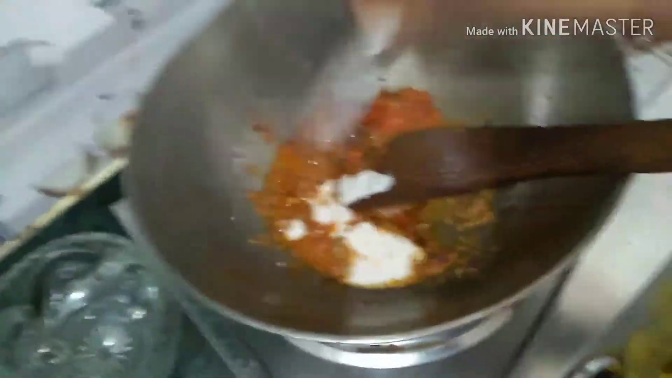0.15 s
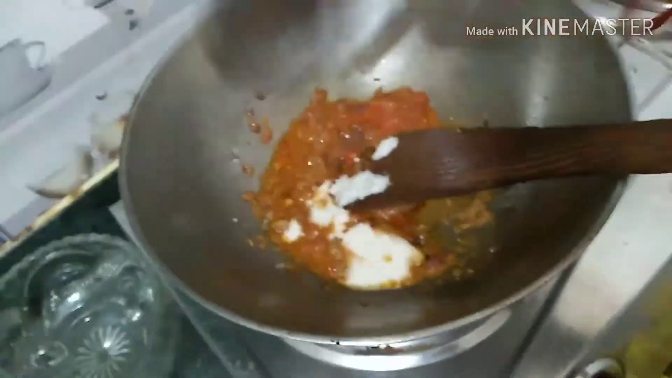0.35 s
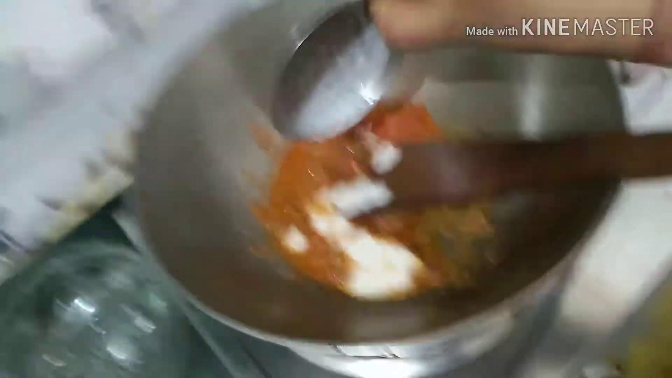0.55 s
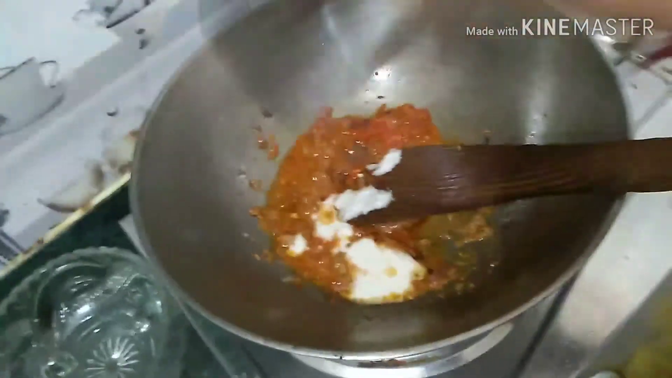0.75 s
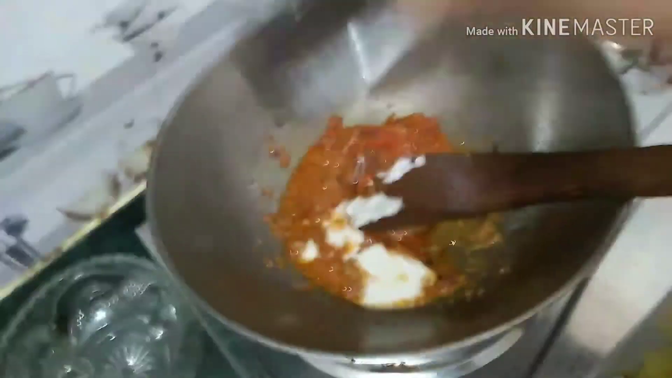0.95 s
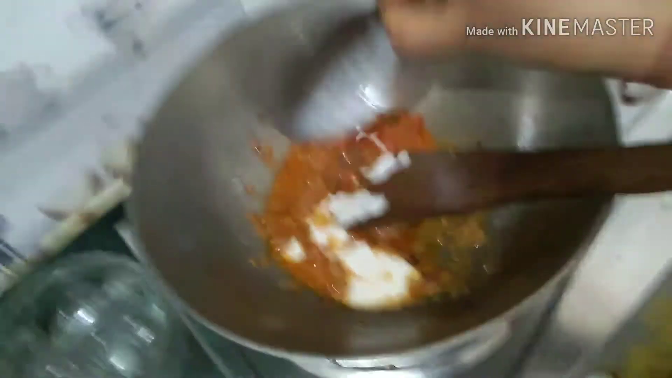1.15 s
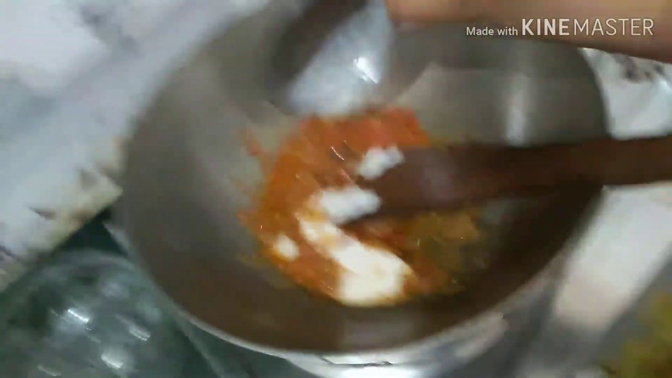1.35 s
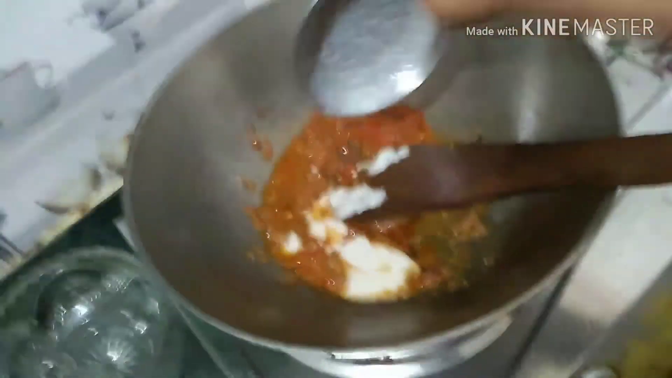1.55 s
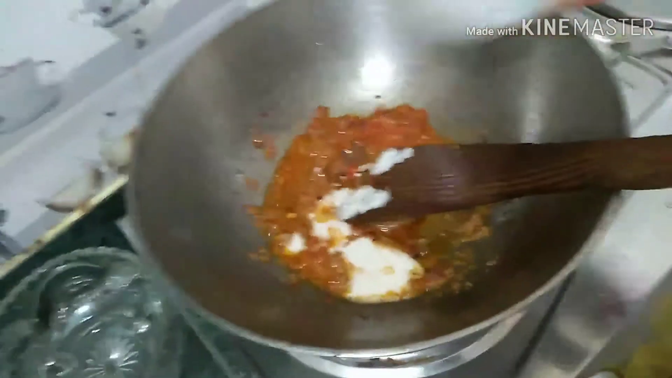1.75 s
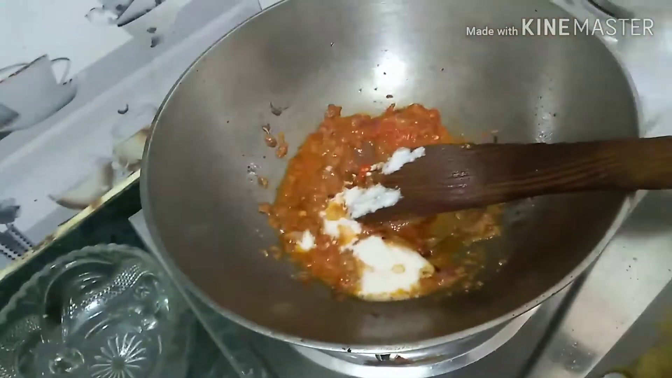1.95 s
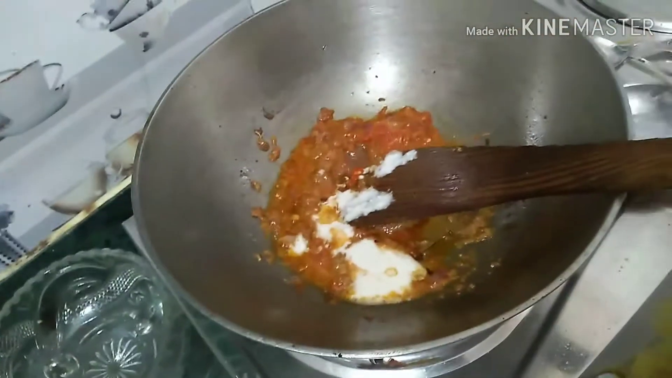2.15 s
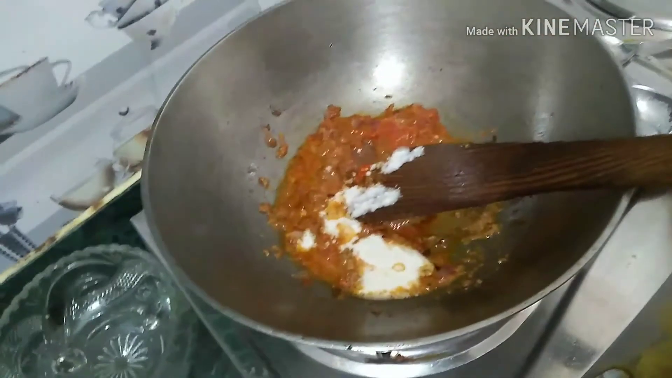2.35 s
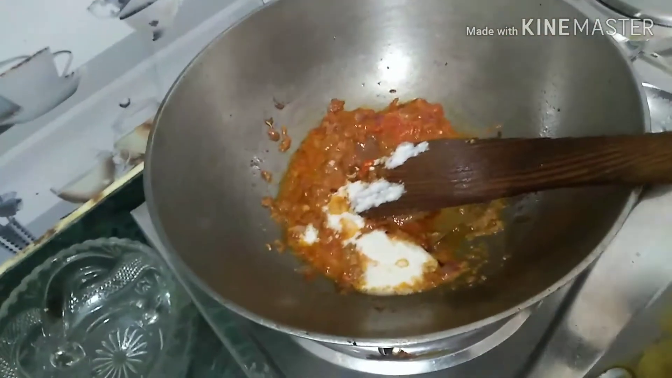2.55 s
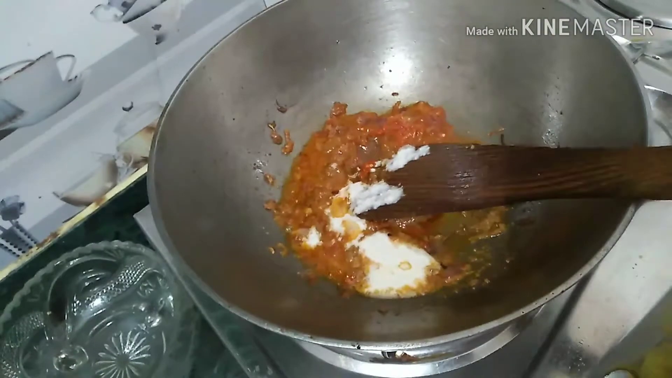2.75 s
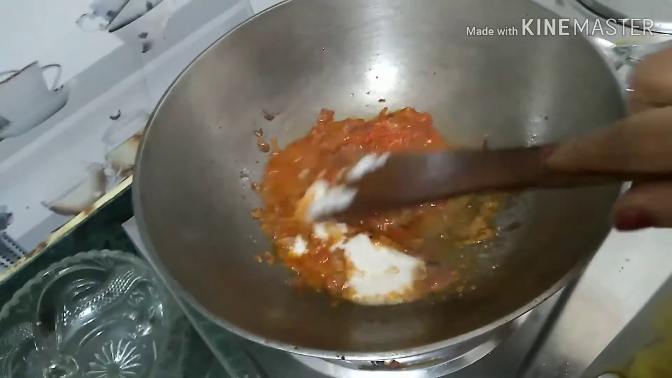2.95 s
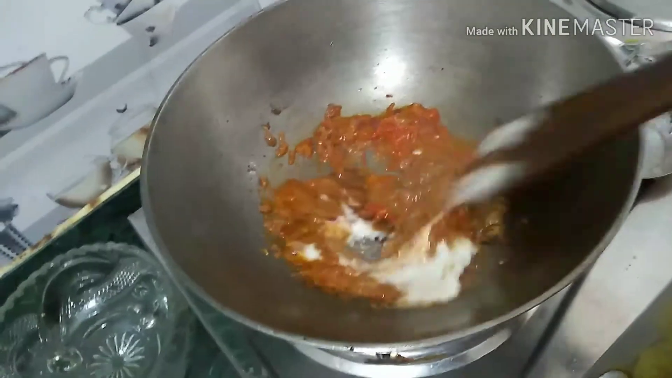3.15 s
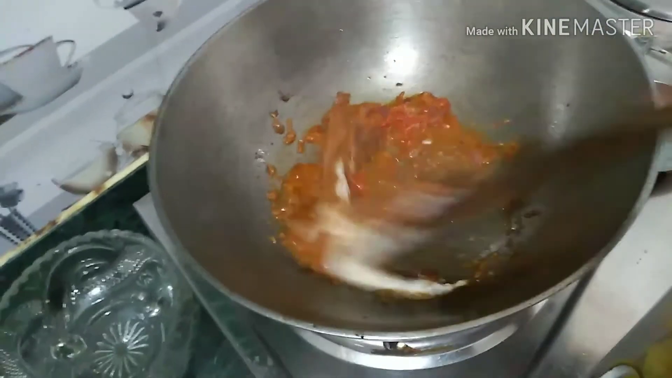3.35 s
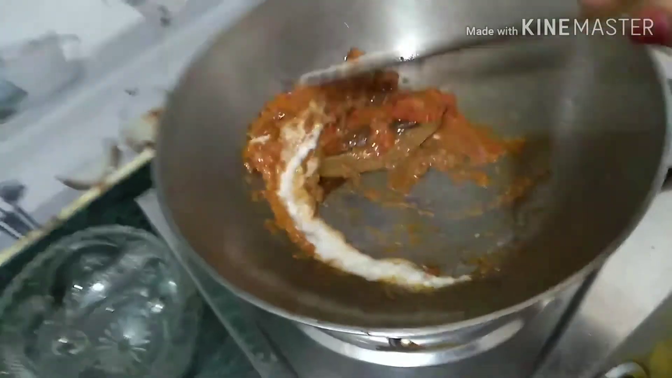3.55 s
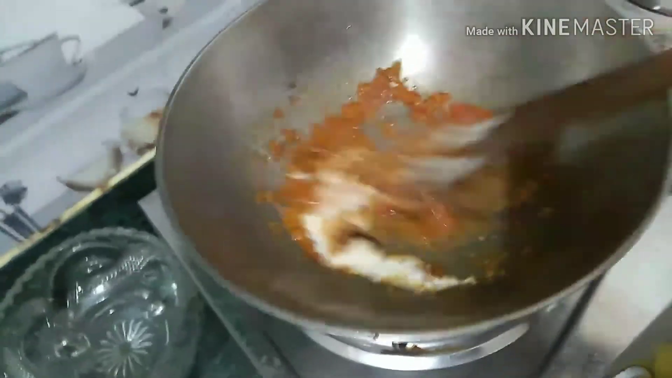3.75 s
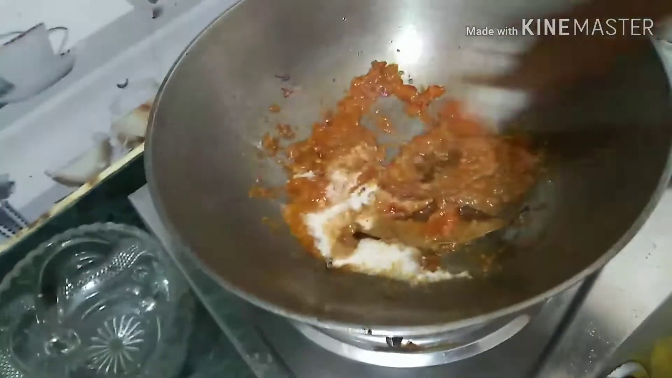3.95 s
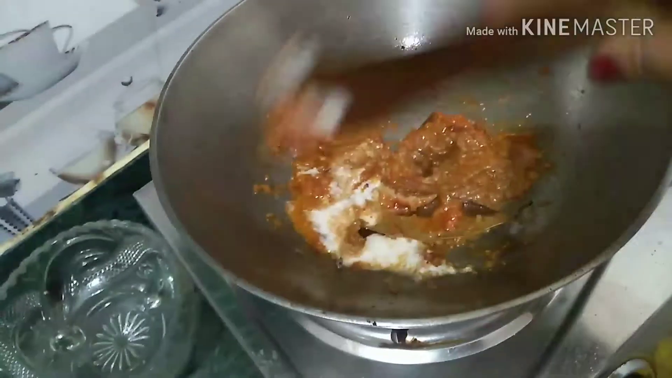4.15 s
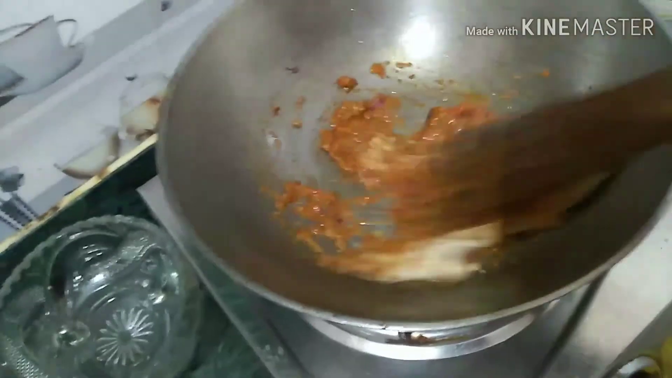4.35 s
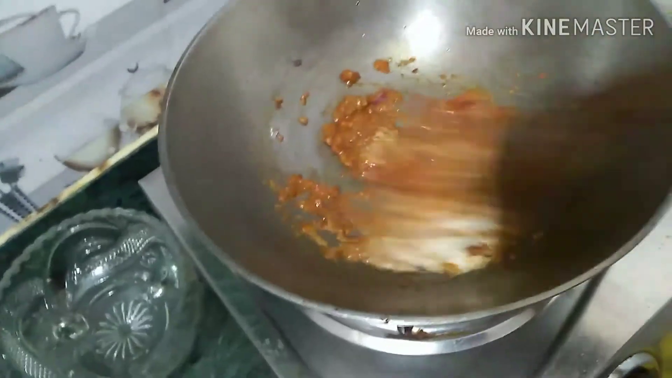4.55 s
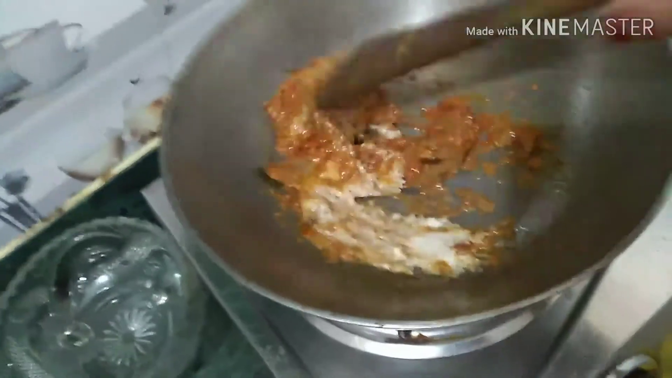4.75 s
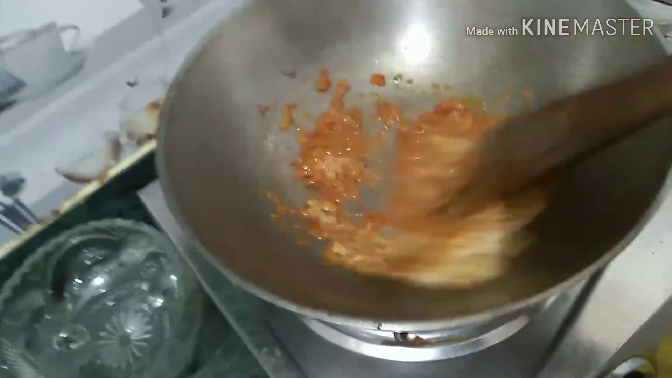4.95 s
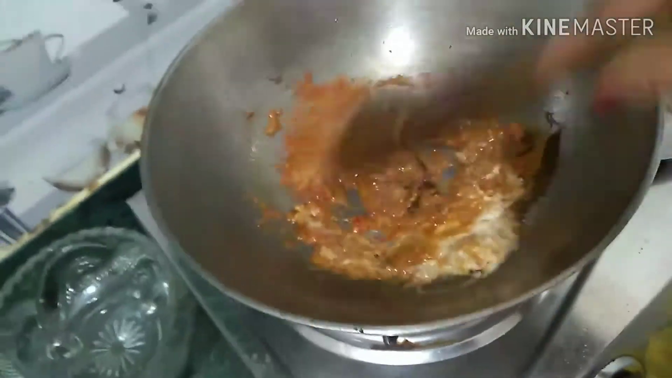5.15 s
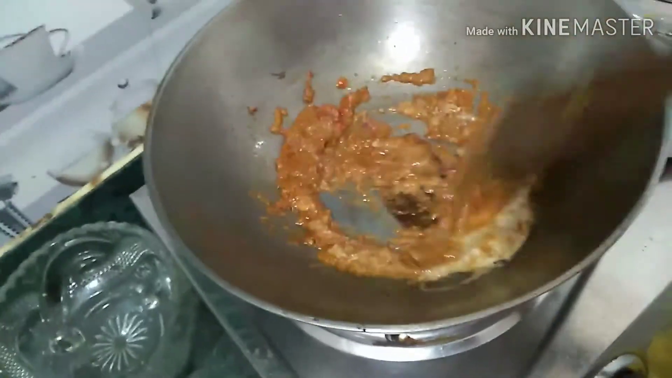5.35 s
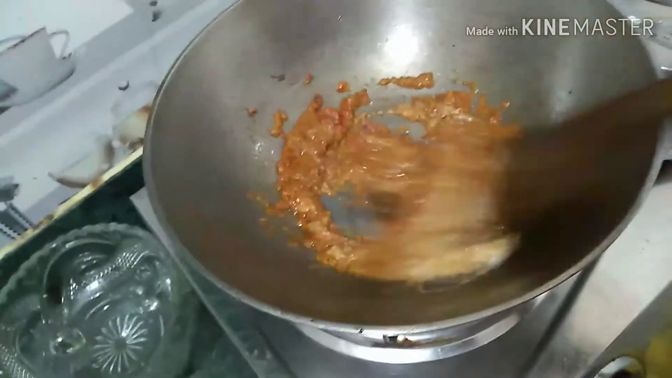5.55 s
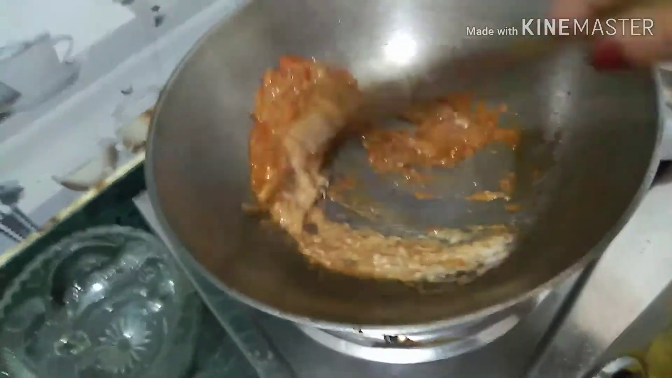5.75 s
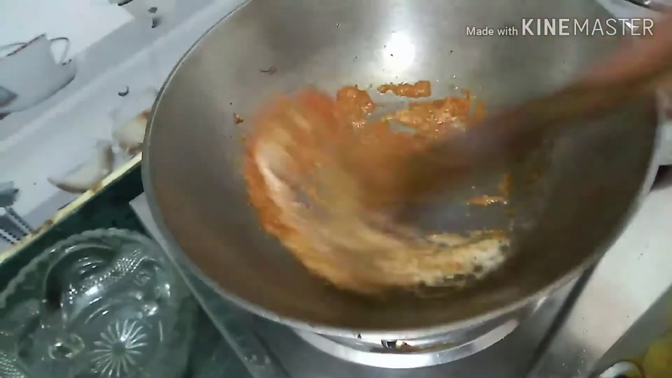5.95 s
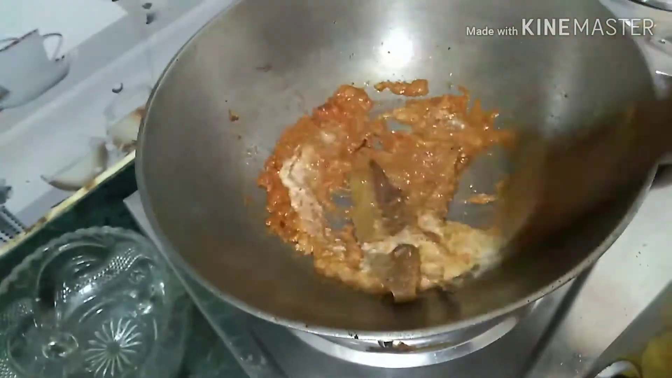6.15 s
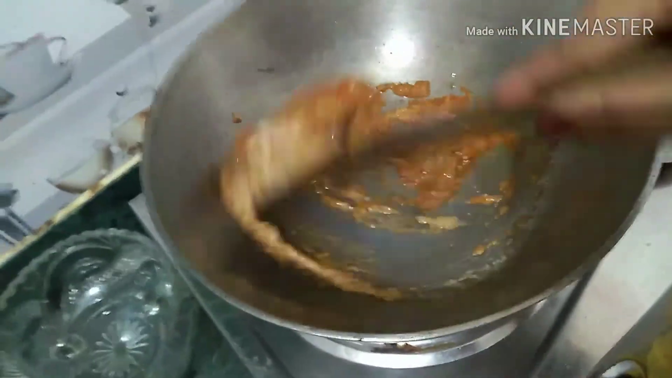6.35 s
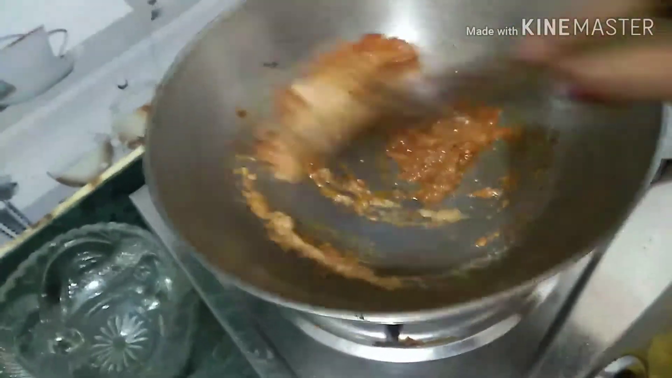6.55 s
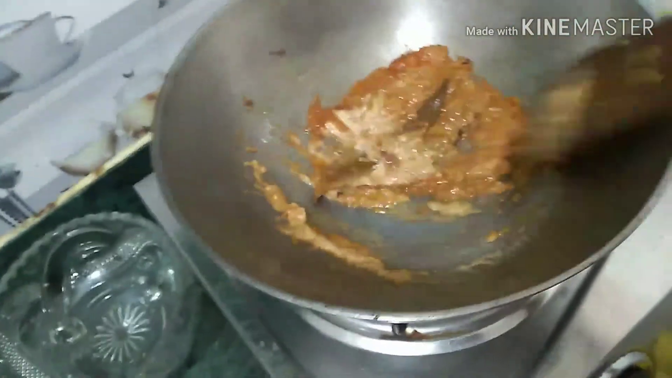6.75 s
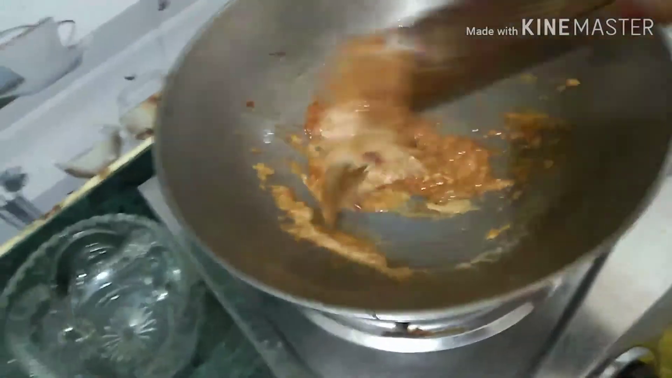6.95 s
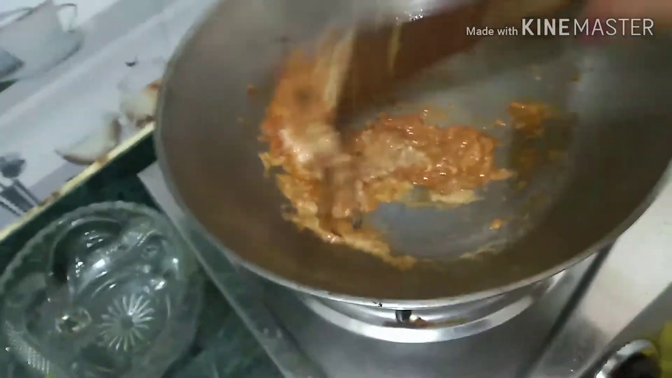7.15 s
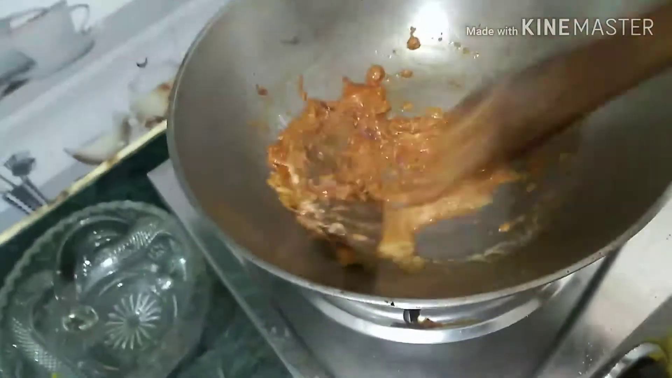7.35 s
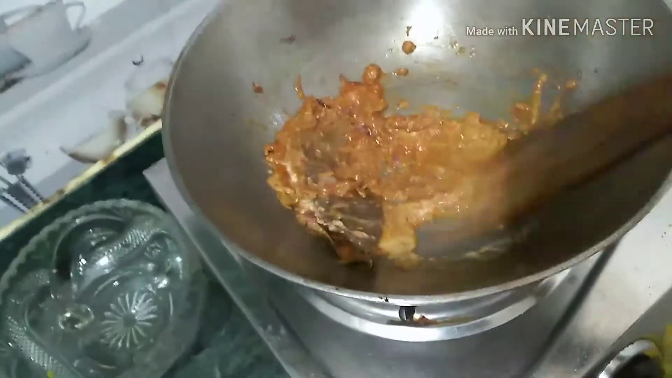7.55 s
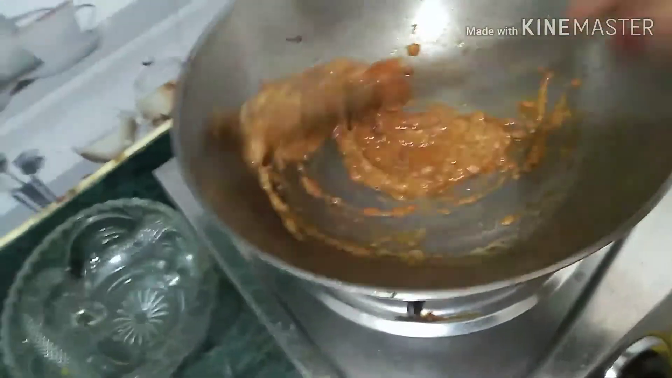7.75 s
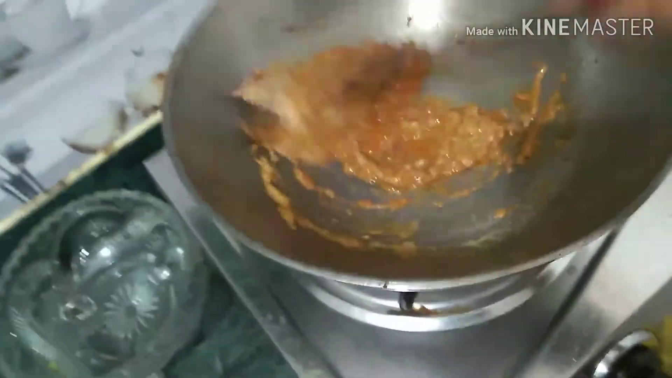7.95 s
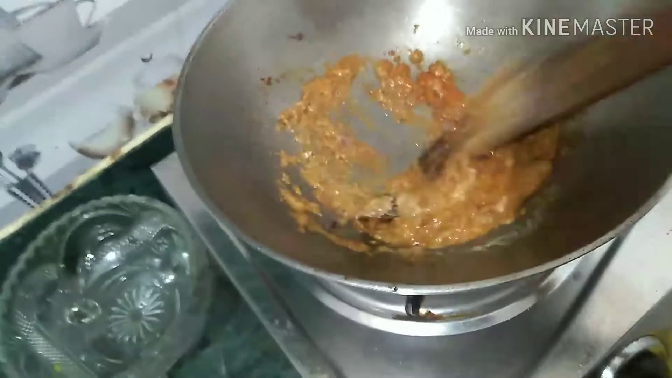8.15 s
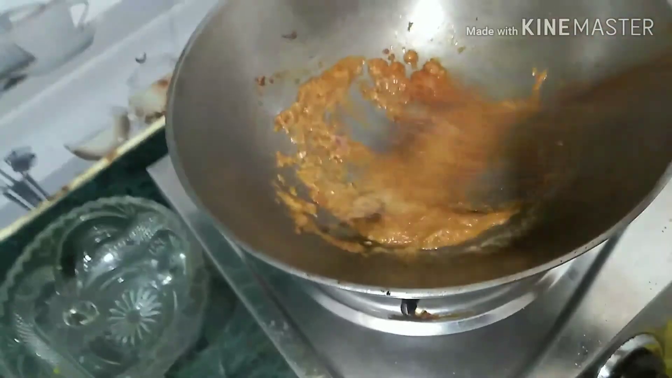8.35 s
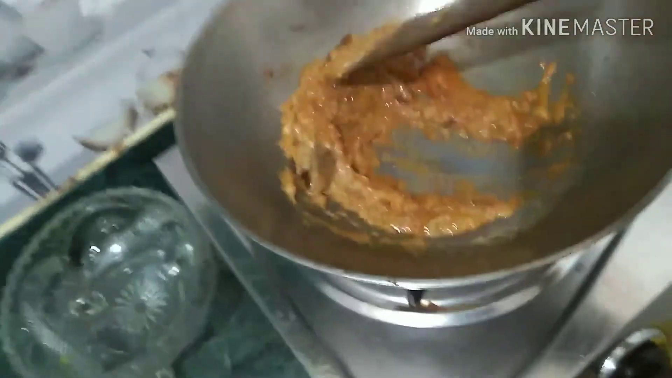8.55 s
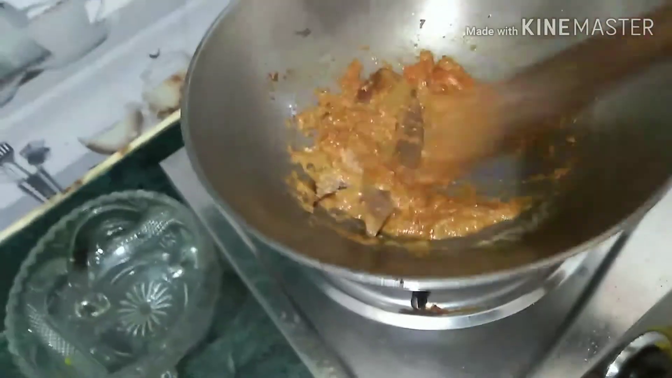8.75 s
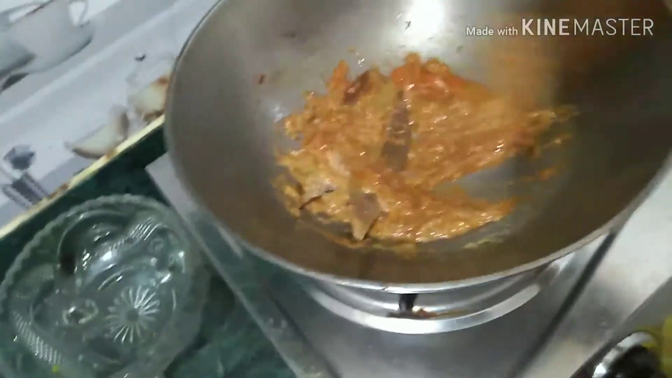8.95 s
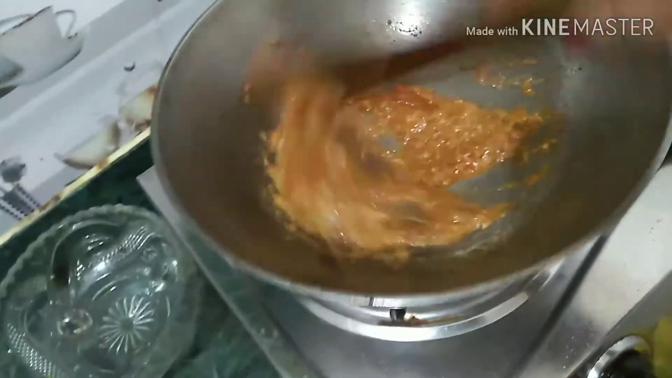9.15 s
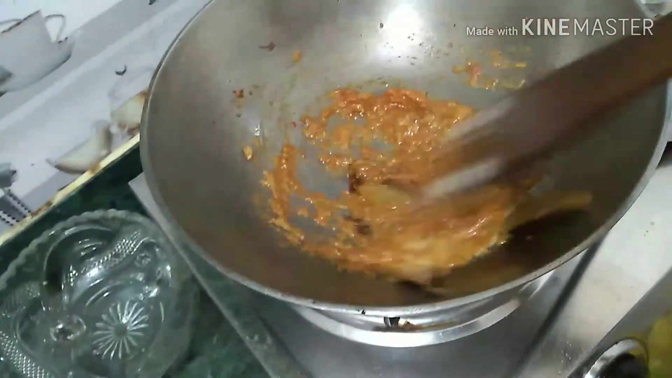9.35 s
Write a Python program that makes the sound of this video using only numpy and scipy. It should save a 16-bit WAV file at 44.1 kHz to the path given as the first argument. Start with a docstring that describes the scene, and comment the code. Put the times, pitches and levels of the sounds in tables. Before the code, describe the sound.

Bright steady frying over a faint burner rush, a hard clattering knock, then wooden scrapes and taps with sizzle surging at each stroke.

```python
"""A small kitchen: spice paste and yoghurt fry in hot oil in a metal pan over a low burner rush.
A utensil is put down with a sharp knock and a bounce; then a wooden spatula stirs.
Strokes scrape the metal, spread wet paste so that the sizzle swells, and rattle the pan on its stand.
Frying is random clicks through band resonances and colouring filters; blows are noise cracks plus
ringing modes and a dying wash; the burner is filtered noise."""
import sys
import numpy as np
from scipy import signal
from scipy.fft import rfft, irfft
from scipy.io import wavfile

SR = 44100
rng = np.random.default_rng(int(sys.argv[2]) if len(sys.argv) > 2 else 0)


def generate_wav(sig):
    """Save sig (samples, or channels by samples) to the path in sys.argv[1] as 16-bit PCM at SR."""
    pcm = np.round(np.clip(np.atleast_2d(sig).T, -1, 1) * 32767).astype(np.int16)
    wavfile.write(sys.argv[1], SR, pcm)


N = 414981
TIME = np.arange(N) / SR
RING_TIME = TIME[:SR // 2]


def from_db(db):
    """Decibels to gain."""
    return 10 ** (np.asarray(db) / 20)


def rms_one(x):
    """Scale to rms 1."""
    return x / np.sqrt(np.mean(x ** 2) + 1e-20)


def unit_energy(x):
    """Scale a response so that it passes white noise at equal power."""
    return x / np.sqrt(np.sum(x ** 2))


def bandpass(x, low_hz, high_hz, order=2):
    """Causal Butterworth band-pass."""
    sos = signal.butter(order, [low_hz, high_hz], "band", fs=SR, output="sos")
    return signal.sosfilt(sos, x)


def smooth(x, keep):
    """One-pole low-pass with unit gain at 0 Hz."""
    return signal.lfilter([1 - keep], [1, -keep], x)


def add_at(out, start_s, sound):
    """Add a sound in place, cut at the end of the scene."""
    start = round(start_s * SR)
    sound = sound[:N - start]
    out[start:][:len(sound)] += sound


def level_curve_db(rows):
    """Interpolate a (t/s, level/dB) curve at every sample."""
    s, db = np.transpose(rows)
    return np.interp(TIME, s, db)


def at_hz(points, hz):
    """Read a table on a log-frequency axis."""
    f, value = np.transpose(points)
    return np.interp(np.log(np.maximum(hz, 1)), np.log(f), value)


def colour(x, spectrum, size=4096):
    """Causal (minimum-phase) filter with the shape of the given spectrum."""
    gain = from_db(at_hz(spectrum, np.fft.rfftfreq(size, 1 / SR)))
    cepstrum = irfft(np.log(gain))
    # fold to positive time: minimum phase
    cepstrum[1:size // 2] *= 2
    cepstrum[size // 2 + 1:] = 0
    response = unit_energy(irfft(np.exp(rfft(cepstrum))))
    return signal.oaconvolve(x, response)[:len(x)]


def drift(knots_per_s):
    """Slow random curve of rms 1, straight between normal knots."""
    knots = rng.standard_normal(4096)
    return rms_one(np.interp(TIME * knots_per_s, np.arange(len(knots)), knots))


def clicks(per_s, spread_db):
    """Random clicks of either sign, mostly small and a few large; rms 1."""
    sizes = from_db(spread_db * np.minimum(rng.exponential(1, N), 6))
    signs = rng.choice([-1, 1], N)
    return rms_one(sizes * signs * (rng.random(N) < per_s / SR))


def swell(start_s, rise_s, steep):
    """Rises quickly to 1 and dies away more slowly."""
    age = np.maximum(TIME - start_s, 0) / rise_s
    return (age * np.exp(1 - age)) ** steep


def stroke(start_s, attack_s, length_s, release_s):
    """Builds up, holds while the spatula moves, then dies away."""
    age = TIME - start_s
    return np.clip(age / attack_s, 0, 1) * np.exp(-np.maximum(age - length_s, 0) / release_s)


def in_kitchen(x, wet_db, fade_s):
    """Each burst comes from another spot, so its reflections are a fresh wash that fades behind it."""
    power = smooth(x ** 2 + 1e-18, np.exp(-1 / (fade_s * SR)))
    wash = np.sqrt(power) * rng.standard_normal(N)
    return (x + from_db(wet_db) * wash) / np.sqrt(1 + from_db(wet_db) ** 2)


# room decay before stretch: f/Hz, t60/s
ROOM_DECAY = [(150, 0.2), (700, 0.42), (2000, 0.41), (5000, 0.31), (12000, 0.084)]


def dying_noise(stretch, count=12):
    """Dense reflections, each band dying at its own pace."""
    out = 0
    edges = np.geomspace(60, 18000, count + 1)
    for low, high in zip(edges, edges[1:]):
        t60_s = stretch * at_hz(ROOM_DECAY, np.sqrt(low * high))
        band = bandpass(rng.standard_normal(len(RING_TIME)), low, high)
        out = out + band * from_db(-60 * RING_TIME / t60_s)
    return unit_energy(out)


def mode_ring(modes, stretch, spread_db=0):
    """The modes of a body after a unit blow; the spot that is struck favours some of them."""
    favour_db = spread_db * rng.standard_normal(len(modes))
    ring = 0
    for (hz, db, t60_s), extra_db in zip(modes, favour_db):
        fade = from_db(db + extra_db - 60 * RING_TIME / (stretch * t60_s))
        ring = ring + fade * np.cos(2 * np.pi * hz * RING_TIME)
    return unit_energy(ring)


def blow_response(spectrum, modes, modes_db, crack_db, crack_s):
    """One blow: a short crack, the ringing modes and the room's tail."""
    crack = unit_energy(rng.standard_normal(len(RING_TIME)) * np.exp(-RING_TIME / crack_s))
    dense = colour(dying_noise(stretch=0.95) + from_db(crack_db) * crack, spectrum)
    return unit_energy(dense + from_db(modes_db) * mode_ring(modes, stretch=0.75, spread_db=5.0))


def strike(rows, spectrum, modes, modes_db, crack_db, crack_s):
    """Blows, each on another spot; a softer contact lets less treble through."""
    out = np.zeros(N)
    for s, db, cut_hz in rows:
        response = blow_response(spectrum, modes, modes_db, crack_db, crack_s)
        add_at(out, s, from_db(db) * smooth(response, np.exp(-2 * np.pi * cut_hz / SR)))
    return out


def tocks(hits, modes, detune):
    """Short hollow tocks at (s, dB), a little different with each grip and spot."""
    out, t = np.zeros(N), TIME[:SR // 5]
    for s, hit_db in hits:
        chance = rng.standard_normal((len(modes), 3))
        ring = 0
        for (hz, db, t60_s), (extra_db, sign, pitch) in zip(modes, chance):
            fade = from_db(hit_db + db + extra_db - 60 * t / t60_s)
            ring = ring + fade * np.sign(sign) * np.sin(2 * np.pi * hz * (1 + detune * pitch) * t)
        add_at(out, s, ring)
    return out


# pan and stove top: f/Hz, level/dB, t60/s before stretch
PAN_RING = [(254, -2, .35), (312, -3, .28), (368, -3, .22), (391, -3, .22), (607, -5, .25), (671, -7, .25),
            (723, -1, .28), (787, -7, .18), (850, -4, .2), (1153, -2, .17), (1327, -4, .17),
            (1475, -4, .22), (1551, -3, .22), (1843, -4, .22), (2494, -4, .18), (2775, -4, .17),
            (3131, -3, .2), (3270, -4, .19)]


def through_pan(x, ring_db):
    """Part of a sound goes into the metal and comes out with its resonances."""
    ring = signal.oaconvolve(x, mode_ring(PAN_RING, stretch=1))[:N]
    return (x + from_db(ring_db) * ring) / np.sqrt(1 + from_db(ring_db) ** 2)


# flame spectrum: f/Hz, level/dB per Hz
BURNER_SPECTRUM = [(25, -30), (42, -42), (65, -5.5), (110, 2), (170, -1), (300, -35), (600, -8.5),
                   (1000, -35), (3000, -22.5)]


def burner(db, waver_db=5.0):
    """The low, wavering rush of the flame: coloured noise with a drifting level."""
    return from_db(db + waver_db * drift(8.3)) * colour(rng.standard_normal(N), BURNER_SPECTRUM)


# soft bumps: t/s, level/dB, half-length/s (to 1/e)
BUMP_TIMES = [(0.2, -56.5, .045), (1.554, -53, 0.091), (1.735, -44, 0.023), (5.297, -53, 0.027),
              (7.154, -51, 0.032)]


def bumps(low_hz=58, high_hz=130):
    """Dull, soft thuds: low noise under bell-shaped envelopes."""
    once = bandpass(rng.standard_normal(N), low_hz, high_hz)
    thud = rms_one(bandpass(once, low_hz, high_hz))
    return thud * sum(from_db(db) * np.exp(-((TIME - s) / length_s) ** 2) for s, db, length_s in BUMP_TIMES)


# utensil put down: t/s, level/dB before gain, contact softness as cut-off f/Hz
UTENSIL_BLOWS = [(2.1955, -13.5, 12000), (2.2, -15, 7000), (2.2125, -21.5, 6000), (2.3125, -26, 900),
                 (2.3178, -17.5, 2600), (2.328, -23, 2000), (2.347, -28, 1400), (2.361, -28, 1800)]
# clatter spectrum: f/Hz, level/dB per Hz
CLATTER_SPECTRUM = [(60, -43), (160, -17), (220, -6), (280, -2), (390, 5), (540, -0.5), (750, 6.5),
                    (970, -0.5), (1130, 2.5), (1400, -0.5), (2000, -1), (3200, 0), (5000, -2), (7000, -2.5),
                    (10000, 2.5), (16000, -0.5)]
# utensil and counter: f/Hz, level/dB, t60/s before stretch
UTENSIL_RING = [(232, -4, .18), (366, -1, .22), (417, -2, .2), (727, 1, .3), (786, -3, .22), (851, -2, .28),
                (1480, -3, .18), (1550, -4, .24), (1766, -5, .3), (1877, -4, .25), (2105, -5, .25),
                (2422, -3, .22), (3268, -6, .3)]


def knock(gain_db=25.0, linger_db=-31, linger_stretch=3.5):
    """A utensil lands hard beside the pan and bounces; a faint wash lingers in the room."""
    blows = from_db(gain_db) * strike(UTENSIL_BLOWS, CLATTER_SPECTRUM, UTENSIL_RING,
                                      modes_db=-11.5, crack_db=4.0, crack_s=0.012)
    wash = signal.oaconvolve(blows, dying_noise(stretch=linger_stretch))[:N]
    return blows + from_db(linger_db) * wash


def singing(start_s=8.3, rise_s=0.074, db=-57, hz=735, width_hz=70):
    """The blade drags slowly round the bowl and keeps a band near a strong pan mode humming."""
    hum = rms_one(bandpass(rng.standard_normal(N), hz - width_hz / 2, hz + width_hz / 2))
    return from_db(db) * swell(start_s, rise_s, steep=.5) * hum


# spatula squeak: f/Hz, level/dB, rise/s
SQUEAK_TONES = [(1841, -44.5, .04), (192, -59, .09), (3950, -53, .025)]


def squeak(start_s=5.484):
    """Wood sticks and slips on the metal and makes the pan sing briefly."""
    wobble_rad = .25 * drift(50)
    out = 0
    for hz, db, rise_s in SQUEAK_TONES:
        tone = np.sin(2 * np.pi * hz * TIME + wobble_rad)
        out = out + from_db(db) * swell(start_s, rise_s, steep=.45) * tone
    return out


# blade scraping metal: start t/s, attack/s, length/s, level/dB
SCRAPE_STROKES = [(3.47, 0.055, 0.15, -47), (3.609, .02, 0.18, -43.5), (4.238, .005, .02, -47),
                  (4.64, .09, 0.14, -41.5), (4.957, .005, .025, -45), (5.705, .012, 0.038, -39),
                  (5.77, .07, .16, -43.5), (5.96, .005, .03, -47), (6.352, 0.065, 0.29, -48.5),
                  (6.968, .015, 0.026, -39), (7.763, 0.11, 0.17, -48.5), (8.031, .008, 0.016, -41),
                  (8.098, .005, 0.034, -45.5), (8.764, .008, 0.017, -44.5)]
# grit under the spatula: f/Hz, level/dB per Hz
GRIT_SPECTRUM = [(300, -59), (1000, -1), (1400, 4), (2100, 11), (3000, 8), (4300, 9), (7000, 2),
                 (14000, -35)]


def scraping(release_s=0.035):
    """Wood drags gritty spices over the metal; the blade bites suddenly or presses in slowly."""
    pressure = sum(from_db(db) * stroke(s, attack_s, length_s, release_s)
                   for s, attack_s, length_s, db in SCRAPE_STROKES)
    grit = in_kitchen(clicks(per_s=2500, spread_db=1.0), wet_db=-6.0, fade_s=0.016)
    return pressure * colour(grit, GRIT_SPECTRUM)


# pan falling back on its stand: t/s, level/dB before gain
DROP_TIMES = [(3.702, -35), (3.785, -33), (3.888, -41), (4.262, -35.5), (4.975, -39), (5.989, -32.5),
              (6.574, -32), (6.62, -31), (7.982, -43), (8.102, -28.5), (8.168, -32.5), (8.3, -43),
              (8.778, -28), (8.811, -41)]
# pan and stand rumble, also under the stirring: f/Hz, level/dB per Hz
RUMBLE_SPECTRUM = [(60, -33), (120, -11.5), (190, -1.5), (260, -2), (400, -1.5), (520, -2), (770, -0.5),
                   (1000, -5), (1600, -13.5), (3000, -12.5), (8000, -22.5)]


def pan_drops(gain_db=21.0, cut_hz=2800):
    """Tilted by the spatula, the pan falls back on its stand with a dull ringing thud."""
    rows = [(s, db, cut_hz) for s, db in DROP_TIMES]
    return from_db(gain_db) * strike(rows, RUMBLE_SPECTRUM, PAN_RING,
                                     modes_db=-0.5, crack_db=-3.0, crack_s=0.0069)


# spatula against pan, also plays stirring: t/s, tap level/dB before gain, tock level/dB,
# thud and rattle level/dB
PAN_CONTACTS = [(3.679, -30, -37, -40.5), (3.706, -29, -50, -43), (4.243, -30.5, -51, -48.5),
                (4.969, -36, -53, -46), (5.06, -33, -44, -50.5), (5.492, -32.5, -58, -56),
                (5.9, -35, -38, -46.5), (5.962, -30, -54, -42), (6.547, -31, -35, -41),
                (6.594, -36, -42, -44), (6.786, -49, -59, -60), (6.905, -32, -40, -48),
                (7.323, -49, -55, -79), (8.016, -28.5, -34, -39), (8.052, -28, -48, -37.5),
                (8.098, -28, -48, -44), (8.69, -33, -40, -44.5), (8.753, -36, -39, -48),
                (8.776, -33, -40, -47), (8.905, -43, -51, -51), (9.083, -41, -41, -48.5),
                (9.211, -44, -46, -52)]
# wooden blade before detune: f/Hz, level/dB, t60/s
BLADE_RING = [(1380, -4, 0.054), (1607, -1, .055), (1854, -1.5, 0.055), (2660, -4, .04)]
# pan pressed onto its stand, before detune: f/Hz, level/dB, t60/s
STAND_RING = [(250, -7, 0.12), (307, -9.5, 0.11), (380, -6, .14), (611, -9, .12)]


def landings(thud_delay_s=0.00586):
    """The blade tocks as it lands and shoves the pan onto its stand, which answers with a low thud."""
    blade = tocks([(s, db) for s, _, db, _ in PAN_CONTACTS], BLADE_RING, detune=.029)
    thuds = [(s + thud_delay_s, db) for s, _, _, db in PAN_CONTACTS]
    return blade + tocks(thuds, STAND_RING, detune=0.014)


def rattle(start_s, rattle_rise_s=0.019, rocking_rise_s=0.11, rocking_db=-13):
    """Power of the pan's motion after a push: a quick rattle and a longer, weaker rocking."""
    rocking = from_db(rocking_db) * swell(start_s, rocking_rise_s, steep=1.0)
    return swell(start_s, rattle_rise_s, steep=0.51) ** 2 + rocking ** 2


# low simmer of the thick paste, with the low rumble that lingers after the knock near 2.45 s: t/s, level/dB
# before gain
SIMMER_LEVEL = [(0, -53.5), (.13, -57), (.36, -67.5), (.75, -63), (1.15, -63.5), (1.6, -59.5), (2.1, -67),
                (2.45, -52.5), (3.1, -61.5), (4.05, -59.5), (4.6, -69), (5.2, -62.5), (7.15, -57),
                (7.4, -71), (7.95, -74), (8.2, -69), (9.41, -71)]
# wood striking the pan: f/Hz, level/dB per Hz
WOOD_SPECTRUM = [(80, -25), (200, -1), (400, -14), (750, -14), (1100, -4), (1750, 3), (2200, -4),
                 (2800, 3.5), (4000, -6.5), (8000, 12.5), (15000, -46)]


def stirring(tap_gain_db=25.5, tap_cut_hz=6600, rebound_cut_hz=1300):
    """Spatula taps and rebounds, then drags in small slips that rumble pan and stand over the simmer."""
    pushed = np.sqrt(sum(from_db(db) ** 2 * rattle(s) for s, _, _, db in PAN_CONTACTS))
    simmer = from_db(level_curve_db(SIMMER_LEVEL))
    slips = in_kitchen(clicks(per_s=450, spread_db=1.25), wet_db=1.5, fade_s=0.016)
    motion = from_db(-3.0) * np.hypot(pushed, simmer) * slips
    rumble = colour(through_pan(motion, ring_db=-13.0), RUMBLE_SPECTRUM)
    taps = [(s, db, tap_cut_hz) for s, db, _, _ in PAN_CONTACTS]
    # second landing: 1 dB weaker and duller
    rebounds = [(s + .02 * rng.uniform(0.44, 1.3), db - 1, rebound_cut_hz) for s, db, _, _ in PAN_CONTACTS]
    blows = strike(taps + rebounds, WOOD_SPECTRUM, PAN_RING, modes_db=-19.5, crack_db=1.0, crack_s=0.0063)
    return rumble + from_db(tap_gain_db) * blows


# oil spitting, wet paste slapped onto hot metal: t/s, level/dB, fade/s
SPIT_TIMES = [(1.099, -18, .003), (1.976, -17.5, .004), (3.4855, -15, .012), (3.5435, -10, .008),
              (3.7035, -10, .007), (4.6728, -9.5, .004), (7.012, -19, .005), (7.056, -11.5, 0.018),
              (7.694, -15.5, .004), (8.016, -18, .0065), (8.051, -7.5, 0.011), (8.097, -16, .007),
              (8.9, -16, 0.019), (9.014, -16, 0.005)]
# snapping oil drops, also in the frying: f/Hz, level/dB per Hz
SNAP_SPECTRUM = [(1000, -20), (3000, -10.5), (7000, -1.5), (10000, 8.5), (15000, -0.5)]


def spits(fizz_db=-18.5):
    """A crack, then a short fizz as the drop boils off."""
    out = np.zeros(N)
    for s, db, fade_s in SPIT_TIMES:
        spit = from_db(fizz_db) * rng.standard_normal(SR // 10) * np.exp(-TIME[:SR // 10] / fade_s)
        spit[0] += 2
        add_at(out, s, from_db(db) * spit)
    return colour(out, SNAP_SPECTRUM)


# frying between strokes, rising as the yoghurt is first mixed in: t/s, level/dB
FRYING_LEVEL = [(0, -39.5), (.8, -39), (2.8, -41.5), (3.4, -37.5), (4.05, -33.5), (5.0, -35), (6.2, -38.5),
                (7.4, -38.5), (8.85, -41)]
# spatula sweeping paste over hot metal: start t/s, length/s, added sizzle level/dB
PASTE_STROKES = [(3.443, 0.13, -30.5), (3.87, 0.047, -36), (4.09, 0.061, -36.5), (4.66, 0.12, -32),
                 (5.664, 0.28, -33), (6.327, 0.28, -32), (6.75, .1, -38), (6.92, 0.125, -30.5),
                 (7.163, 0.06, -40.5), (7.7, 0.31, -35.5), (8.89, 0.42, -40)]


def sizzle_level_db(attack_s=0.075, release_s=0.21, flutter_db=0.55, flutter_per_s=55):
    """Strokes wet fresh hot metal, adding sizzle to the steady frying until it has boiled off."""
    steady = from_db(level_curve_db(FRYING_LEVEL)) ** 2
    fresh = sum((from_db(db) * stroke(s, attack_s, length_s, release_s)) ** 2
                for s, length_s, db in PASTE_STROKES)
    # paste meets the metal in lumps
    flutter = from_db(flutter_db * drift(flutter_per_s)) ** 2
    return 10 * np.log10(steady + fresh * flutter)


# water cracking in oil: f/Hz, level/dB per Hz
CRACK_SPECTRUM = [(500, -23), (1000, -14), (1900, -7), (2800, -5.5), (4300, -1.5), (9500, -4), (15000, -11)]


def crackles(db=-16.0):
    """Drops of water crack in the oil at random, sharp and broad, with a brief fizz behind."""
    cracks = in_kitchen(clicks(per_s=80, spread_db=1.5), wet_db=2.0, fade_s=0.0095)
    return from_db(sizzle_level_db() + db) * colour(cracks, CRACK_SPECTRUM)


def flurries(per_s, spread_db, fade_s, share):
    """A breaking blister sets off a flurry of tiny bursts that dies quickly; mean 1."""
    breaks = np.abs(clicks(per_s, spread_db)) + 1e-18
    surge = signal.lfilter([1], [1, -np.exp(-1 / (fade_s * SR))], breaks)
    return 1 - share + share * surge / np.mean(surge)


def bursts(per_s, spread_db, snap_db, low_hz, high_hz, count=7):
    """Steam bubbles burst: each rings a few cycles at a pitch set by its size, and some just snap."""
    out = from_db(snap_db) * clicks(per_s, spread_db)
    edges = np.geomspace(low_hz, high_hz, count + 1)
    for low, high in zip(edges, edges[1:]):
        out += bandpass(clicks(per_s, spread_db), low, high, order=1)
    return rms_one(out)


# fine sizzle: f/Hz, level/dB per Hz
SIZZLE_SPECTRUM = [(1000, -30.5), (2500, -31), (4200, -21), (5500, -13), (7000, -7), (8200, -3.5),
                   (9200, 1), (10300, -2.5), (11500, -7), (13000, -12), (15500, -17.5)]
# coarse sputter: f/Hz, level/dB per Hz
SPUTTER_SPECTRUM = [(150, -22), (320, -42.5), (530, 0), (680, -18.5), (780, -4.5), (900, -11), (1350, -1.5),
                    (2000, 2), (2400, 2), (2800, -3.5), (3500, 1.5), (4300, 3), (5200, -3), (9000, -9.5)]


def frying():
    """Fine sizzle, dry snaps, coarser sputter; wet paste makes all louder and the fine bursts denser."""
    sizzle_db = sizzle_level_db()
    swell_db = sizzle_db - np.mean(sizzle_db)
    activity = flurries(per_s=380, spread_db=3.0, fade_s=.004, share=.55)
    crowd = from_db(0.99 * swell_db)
    fine = bursts(6500 * activity * crowd, spread_db=2.5, snap_db=-11.0, low_hz=3760, high_hz=19100)
    # denser, not louder, at this step
    fine = in_kitchen(fine / np.sqrt(crowd), wet_db=-3.5, fade_s=0.03)
    # larger bubbles pop with a short fizz behind
    pops = in_kitchen(clicks(per_s=510, spread_db=2.5), wet_db=6.0, fade_s=0.0011)
    fine = colour(fine + from_db(-6.0) * pops, SIZZLE_SPECTRUM)
    # smallest drops snap without ringing
    snaps = in_kitchen(clicks(per_s=2200, spread_db=3.2), wet_db=-7.0, fade_s=.004)
    snaps = colour(snaps, SNAP_SPECTRUM)
    coarse = bursts(3800 * activity, spread_db=2.5, snap_db=-1.0, low_hz=480, high_hz=6570)
    coarse = in_kitchen(coarse, wet_db=-3.5, fade_s=0.015)
    coarse = colour(through_pan(coarse, ring_db=-18.0), SPUTTER_SPECTRUM)
    bright = from_db(sizzle_db) * (from_db(-1.5) * fine + from_db(-3.0) * snaps)
    return bright + from_db(-49.0 + 0.48 * swell_db) * coarse


# brief hollows: t/s, centre f/Hz, half-length/s (to 1/e)
HOLLOW_TIMES = [(.08, 850, 0.09), (.41, 310, 0.071), (0.848, 960, 0.064), (1.13, 310, 0.075),
                (1.284, 960, 0.051), (1.737, 940, 0.13), (1.915, 1050, 0.027), (3.082, 850, 0.058),
                (3.177, 330, .03), (4.65, 925, 0.063), (5.427, 920, 0.073), (6.388, 920, 0.12),
                (7.478, 940, 0.077), (7.7, 380, .06), (8.61, 980, 0.12), (9.363, 1060, 0.07)]


def hollowed(x, width_hz=330, depth=0.8):
    """Now and then a band of the sound hollows out for a moment: its zero-phase copy is subtracted."""
    out = x.copy()
    for s, hz, length_s in HOLLOW_TIMES:
        sos = signal.butter(2, [hz - width_hz / 2, hz + width_hz / 2], "band", fs=SR, output="sos")
        gate = np.exp(-((TIME - s) / length_s) ** 4)
        out -= depth * gate * signal.sosfiltfilt(sos, x)
    return out


def scene():
    """Sum all layers to mono, hollow them, and send the same signal to both channels."""
    spatula = stirring() + landings() + pan_drops() + scraping() + squeak() + singing()
    fry = frying() + crackles() + spits()
    mono = hollowed(fry + spatula + knock() + bumps() + burner(db=-65.5))
    return np.array([mono, mono])


def record(dry, cutoff_hz=15500):
    """Steep elliptic low-pass on the top."""
    return signal.sosfilt(signal.ellip(12, .1, 80, cutoff_hz, fs=SR, output="sos"), dry)


dry = scene()
out = record(dry)
generate_wav(out)
```